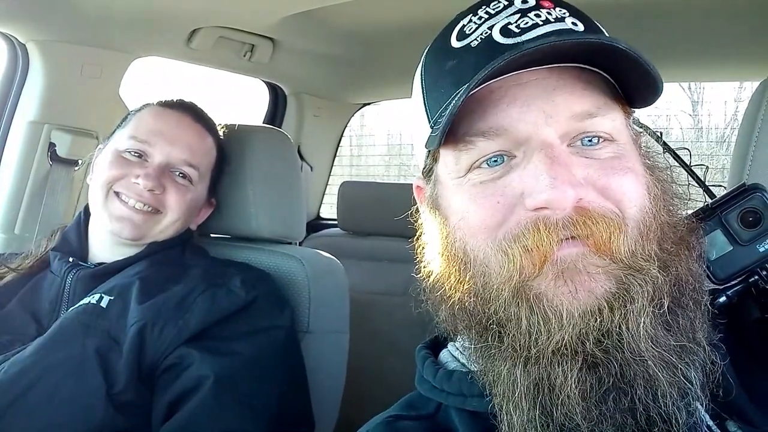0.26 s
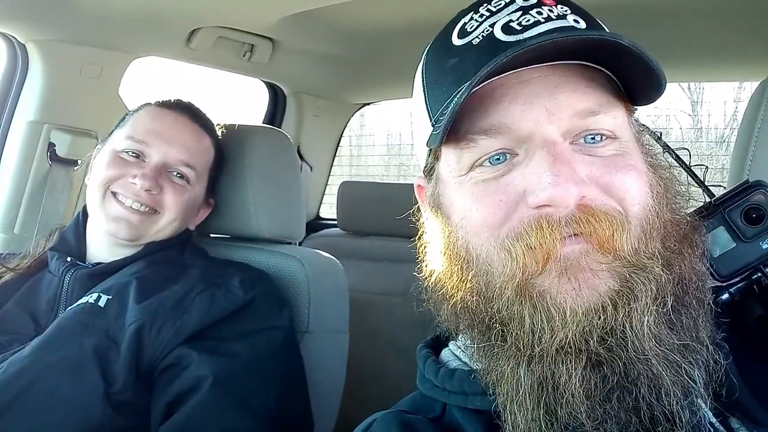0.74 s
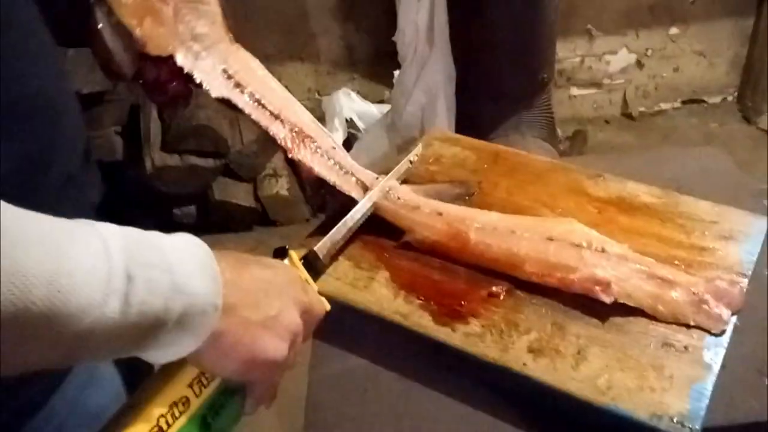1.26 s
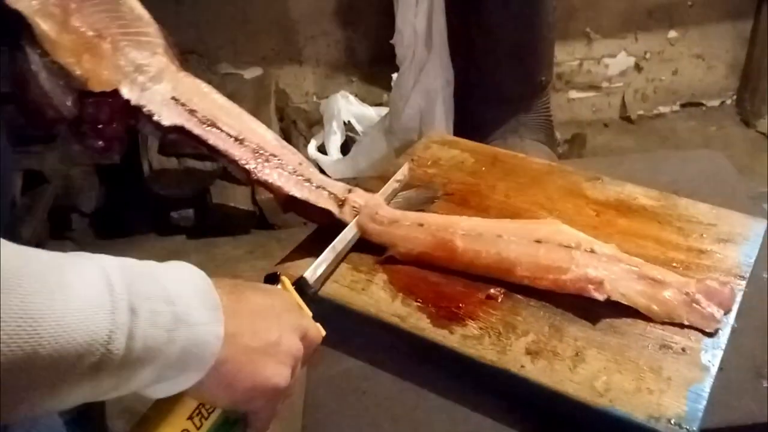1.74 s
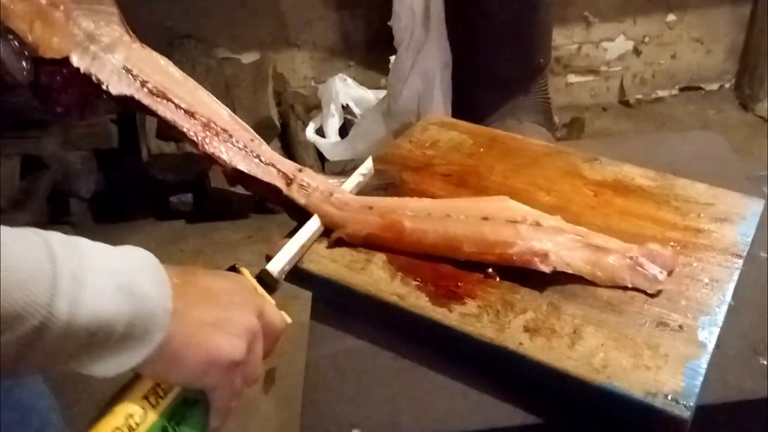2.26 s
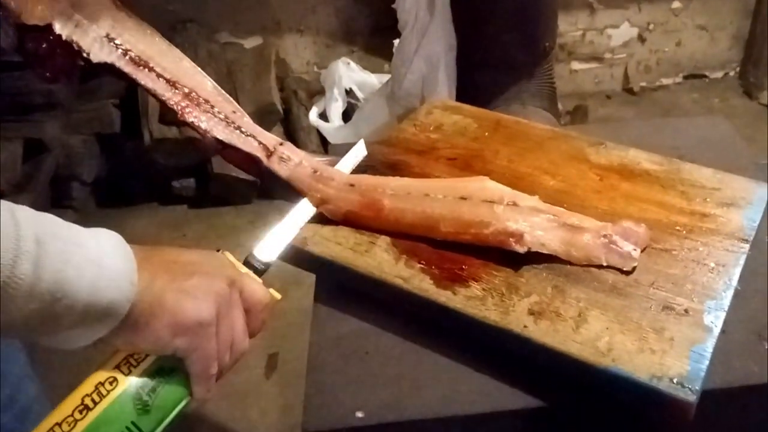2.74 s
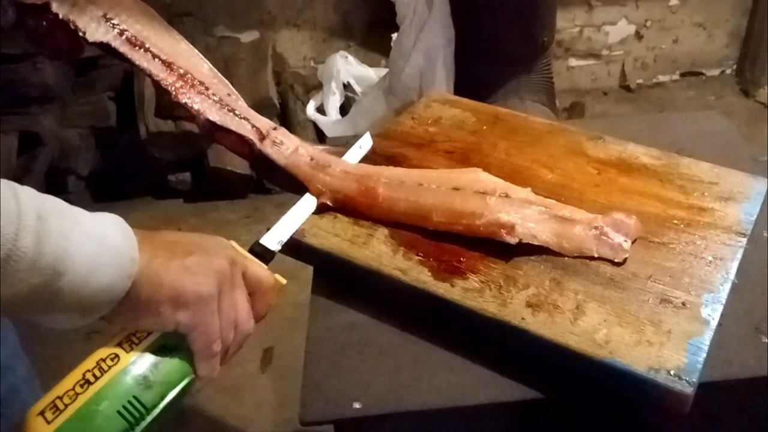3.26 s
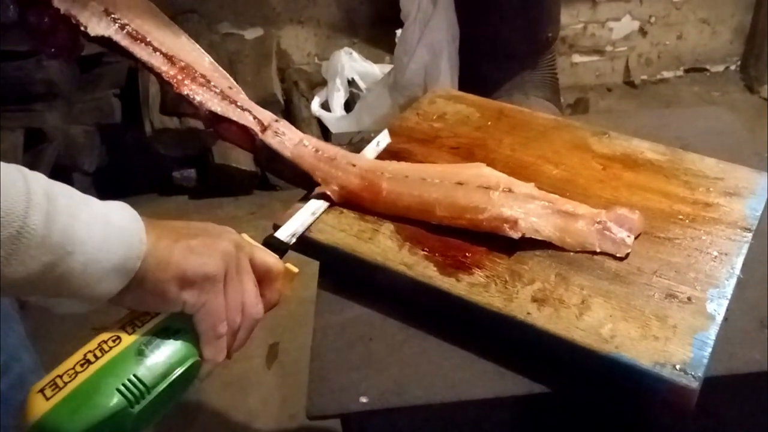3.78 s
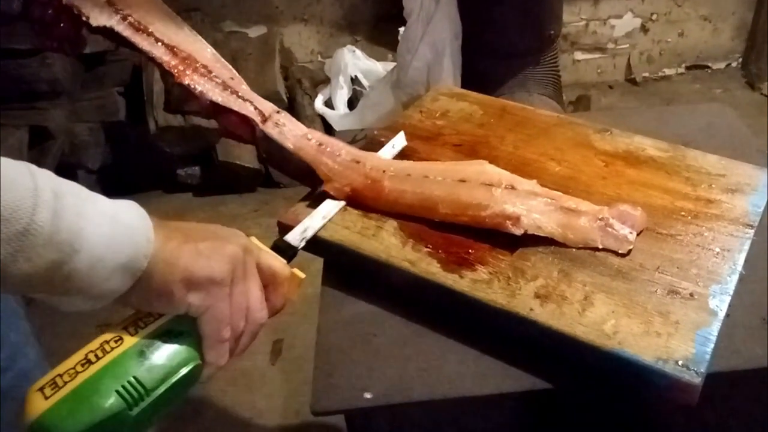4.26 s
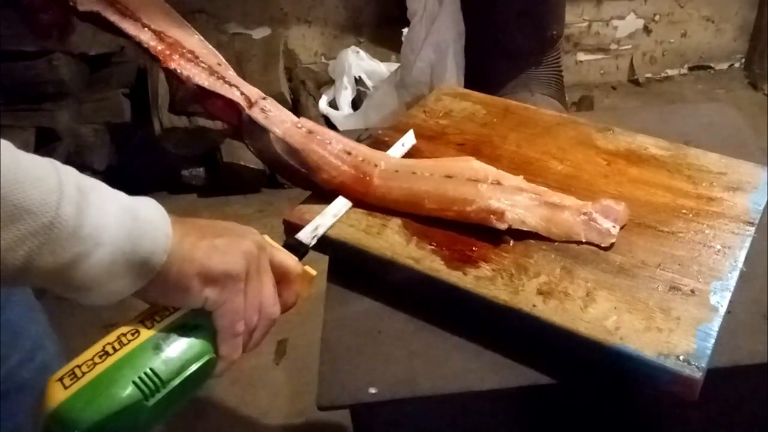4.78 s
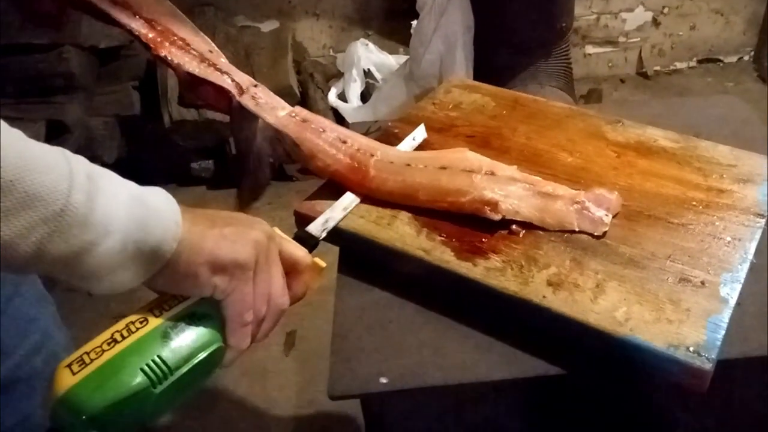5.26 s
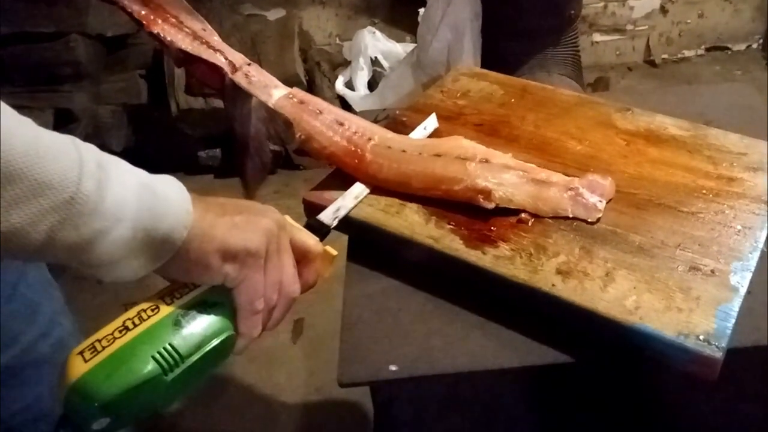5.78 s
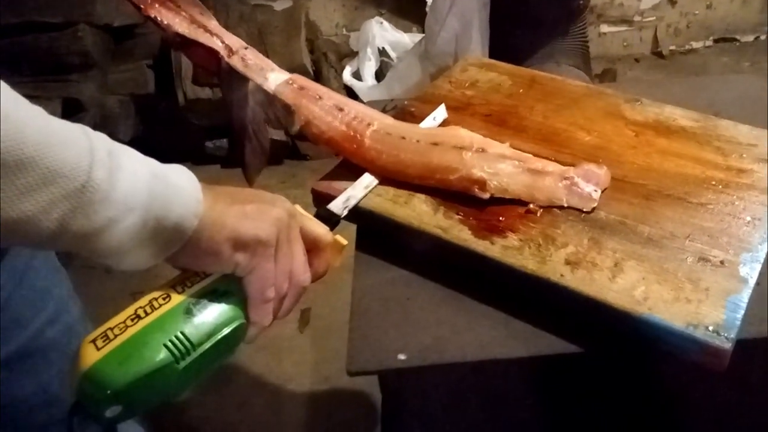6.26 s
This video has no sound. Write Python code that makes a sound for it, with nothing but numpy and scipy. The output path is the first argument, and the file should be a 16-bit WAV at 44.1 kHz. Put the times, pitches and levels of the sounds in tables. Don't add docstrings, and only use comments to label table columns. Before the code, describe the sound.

Brief jacket rustle and thump inside a still car cabin, a short silence, then a harsh buzzing electric knife motor runs on, slowly sagging in pitch.

```python
import sys
import numpy as np
from scipy import signal
from scipy.fft import rfft, irfft, next_fast_len
from scipy.io import wavfile
from scipy.ndimage import uniform_filter1d, map_coordinates

SR = 44100
rng = np.random.default_rng(int(sys.argv[2]) if len(sys.argv) > 2 else 0)


def gain_from_db(level_db):
    decades = np.asarray(level_db, float) / 20
    return 10 ** decades


def unload_wav(signal):
    wavfile.write(
        sys.argv[1],
        SR,
        np.round(np.clip(np.atleast_2d(signal).T, -1, 1) * 32767).astype(np.int16),
    )


N = 287532

# freq_hz, density_db
CABIN_SPECTRUM = [(18, -50), (30, -30), (79, -13), (133, -9), (202, -17), (315, -18), (455, -15),
                  (606, -16), (2830, -13.5), (4650, -5), (5300, 4), (6540, 9), (8500, -3.5), (15500, -22)]
# freq_hz, density_db
CLOTH_SPECTRUM = [(59, -58), (100, -23), (244, -31), (535, -4), (721, -25), (970, 4.5), (1080, -11),
                  (2580, -9), (4470, -11.5), (6700, -7.5), (16000, -42)]
# freq_hz, density_db
KNOCK_SPECTRUM = [(200, -28), (600, -3), (1600, 11), (3000, -3), (4500, -24), (6500, -7), (9000, -39),
                  (16000, -38)]
# freq_hz, density_db
HOUSING_SPECTRUM = [(280, -42), (480, -21), (732, 0.5), (899, -6), (1180, -2), (1820, -5), (1990, -5.5),
                    (2190, -4.5), (2440, -9.5), (2540, -6), (3090, -17), (4230, -27.5), (5000, -23.5),
                    (6500, -76), (11000, -120)]
# centre_hz, width_hz, peak_db
SHELL_MODES = [(656, 14, 7), (817, 65, 8.5), (1000, 100, 3), (1192, 67, 5), (2035, 17, 7)]
# freq_hz, density_db
VENT_SPECTRUM = [(1760, -31), (3000, -5.5), (3400, -14), (3880, -6.5), (4240, -27), (4910, -13.5),
                 (5180, -8), (6560, -0.5), (8650, -13), (9340, -16.5), (10900, -16.5), (12100, -16.5),
                 (13000, -25), (14400, -21.5), (15700, -22)]
# freq_hz, density_db
BOARD_SPECTRUM = [(100, -44), (190, -27), (260, -9.5), (400, -5), (520, -2.5), (600, 5.5), (800, -73)]
# freq_hz, density_db
RUMBLE_SPECTRUM = [(15, -30), (40, -30), (90, -26), (130, 8), (190, -1), (300, -49)]

# peak_s, rise_s_per_10db, fall_s_per_10db, level_db, centre_hz
SWISHES = [
    (.005, .05, .06, -54, 1400),
    (.058, .035, 0.036, -43.5, 2400),
    (.105, .04, .022, -43, 1125),
    (.155, .02, 0.042, -60.5, 990),
    (.208, .02, .035, -55.5, 3030),
    (.27, .02, 0.062, -66, 1400),
]
# time_s, pitch_hz, level_db
SQUEAK = [(.035, 2950, -67), (.045, 2700, -46), (.06, 2610, -43), (.08, 2530, -68)]
# start_s, peak_db, pitch_hz, t60_s
RING_KNOCKS = [
    (.112, -35, 125, 0.05),
    (.209, -48, 3110, .044),
    (.244, -35, 1000, 0.042),
    (.254, -45, 131, .18),
    (.248, -39.5, 297, 0.028),
    (.608, -62, 1000, 0.14),
    (.642, -56, 873, .12),
    (.66, -51, 887, .06),
    (2.16, -40, 164, 0.2),
]
# start_s, level_db, t60_s
CRACKS = [
    (.244, -39.5, 0.027),
    (.254, -70, .1),
    (0.273, -55, 0.088),
    (1.318, -54, 0.053),
    (1.342, -56, .04),
    (1.37, -52, 0.059),
    (1.388, -30, 0.038),
]

# position_strokes, width_strokes, boost_db
CRANK_KNOCKS = [
    (.30, 0.17, -2),
    (0.406, 0.014, 9),
    (.54, .02, -5),
    (0.802, 0.049, 0),
]
# time_s, speed_turns_per_s
SPEED_GOAL = [(1.43, 370), (1.49, 384), (1.6, 374.5), (1.83, 367.5), (2.15, 370.7), (2.33, 370.3),
              (2.5, 366.3), (2.62, 361.4), (2.9, 348.1), (3.1, 342.7), (3.4, 339.9), (3.9, 344.8),
              (4.15, 343.2), (4.55, 334.2), (4.85, 327.9), (5.2, 327.1), (6.2, 328.3), (6.52, 327.8)]
# peak_s, half_length_s, pitch_hz, t60_s, level_db
SURGES = [
    (1.432, 0.034, 2440, 0.011, -31),
    (1.6, 0.014, 1300, .005, -58),
    (3.588, 0.087, 950, 0.023, -27),
]
# start_s, end_s, level_db
PRESSES = [
    (1.67, 1.778, -68),
    (2.129, 2.27, -63),
    (2.503, 2.8, -57),
    (2.967, 3.45, -55),
    (4.17, 4.723, -51),
    (4.833, 5.727, -53),
    (5.826, 6.6, -54.5),
]
# peak_s, half_length_s, thrum_boost_db, rumble_boost_db
BUMPS = [
    (1.76, .03, -1, -6),
    (2.173, 0.083, 0, 15.5),
    (2.926, .25, -0.5, 13.5),
    (3.55, .12, 0.5, -6.0),
    (3.863, 0.04, 2.5, 3),
    (6.38, 0.088, -1, 6.0),
]
# peak_s, half_length_s, tick_boost_db
BINDS = [
    (2.046, 0.077, 6),
    (3.5, .3, 1),
    (5.5, 0.1, 6.0),
    (6.053, .08, 5.0),
]
# multiple_of_turn_rate, level_db, full_load_db, strain_db
SLOT_TONES = [(7.998, -0.6, 2.5, -3), (15.94, -2.3, 3, -6), (24.3, -11.0, -1, 16.5), (31.86, -1.8, 4, -6)]
# centre_hz, width_hz, peak_db
SLOT_MODES = [(1200, 200, -24), (1650, 300, -37), (2060, 170, -23), (3400, 300, -39), (6800, 500, -42),
              (2600, 130, -32), (2700, 60, -32), (2935, 60, -32), (5480, 150, -42), (5660, 200, -39),
              (5860, 120, -43), (7700, 500, -52), (10800, 900, -53), (11750, 300, -54)]
# peak_s, half_length_s, multiple_of_turn_rate, change_db
FLARES = [(1.425, .025, 16, 12), (1.47, .02, 16, -8), (2.72, .07, 8, -10), (1.68, .03, 8, -4),
          (2.8, .07, 16, 4), (1.62, .05, 24, 5), (1.45, .03, 8, 7), (1.48, .035, 24, -10),
          (1.68, .08, 16, 6), (1.57, .04, 16, 8), (1.585, .03, 8, 2), (4.55, .17, 8, 3),
          (3.33, .2, 8, -4.0), (4.36, .06, 8, 3.0), (4.89, .08, 16, -9.0), (5.4, .4, 16, -6.0),
          (6.25, .25, 16, 6.0), (2.05, .08, 32, -7.0), (2.75, .1, 32, -5.0)]
FAINT_MULTIPLES = (1.2, 1.3, 2, 2.1, 2.2, 2.3, 2.4, 3, 4, 4.4, 5.9, 6.2, 7.8, 8.2, 8.6, 8.8, 9, 20, 26, 29,
                    30, 34, 38, 48)
# early_cut_db, deep_cut_db
FAINT_LEVELS = [(-60, -55), (-57, -53), (-39, -39), (-43, -48), (-43, -38), (-45, -47), (-46, -43),
                (-39, -44), (-43, -47), (-47, -44), (-43, -46), (-45, -49), (-50, -42), (-58, -51),
                (-58, -51), (-58, -52), (-60, -54), (-52, -56), (-64, -57), (-70, -69), (-62, -67),
                (-66, -69), (-70, -65), (-54, -63)]
# peak_s, half_length_s, multiple_of_turn_rate, side_sign, level_db
SIDE_TONES = [
    (5.5, 0.83, 16, -1, -54),
    (5.5, 1.0, 16, 1, -63),
]

CUT_S, RESUME_S, SHED_DB = 1.213, 1.256, -87
CABIN_LOW_DB, CABIN_HIGH_DB, CABIN_TOP_DB = -69.5, -78, -89
SETTLE_S, SETTLE_FALL_S, SETTLE_DB = .27, .08, -68
TURNS_PER_STROKE, MAINS_BEAT_HZ = 10, 120
SWITCH_ON_S, SPIN_UP_S, UP_TO_SPEED_S = 1.345, .2, 2.0
FREE_TURNS_PER_S, SAG_TURNS_PER_S = 370, 43
RATED_TURNS_PER_S = 350
JOLT_S, JOLT_RISE_S, JOLT_FALL_S = 1.415, .02, 0.055
# level_db at rated speed, speed_power, start_jolt_db
RATTLE, HISS, THRUM = (-28, 1.28, -28), (-39, 2, -41), (-52, 1.4, -60)
RUMBLE_DB, HUM_REST_DB, TICK_DB, TICK_DEEP_DB = -78, -71, -60, 7
PRESS_EDGE_S = 0.14
DEEP_CUT_S = 3.4, 5.1
BITE_S, BITE_HALF_S, BITE_DB = 3.92, 0.64, 2
BEATING_S, BEATING_HALF_S, BEATING_DEPTH = 3.5, .85, .7
DEAD_HZ, DEAD_WIDTH_HZ, DEAD_DB = 4300, 500, -10
BOOM_HZ, BOOM_STRAIN_DB = 950, -10
LOW_LINES_STRAIN_DB = -55
FAINT_FREE_DB, FAINT_LOAD_DB, FAINT_RUN_UP_DB = -16.5, 21.5, -2


def rms_one(x):
    return x / np.sqrt(np.mean(x ** 2) + 1e-20)


def in_time(rows):
    s, *columns = np.transpose(rows)
    return [np.interp(np.arange(N) / SR, s, c) for c in columns]


def window(start_s, stop_s):
    t = np.arange(N) / SR
    return np.clip((t - start_s) * 500, 0, 1) * np.clip((stop_s - t) * 500, 0, 1)


def swell(at_s, half_s):
    return np.exp(-((np.arange(N) / SR - at_s) / half_s) ** 2)


def slopes_db(at_s, rise_s, fall_s):
    t = np.arange(N) / SR - at_s
    return -10 * np.maximum(-t / rise_s, t / fall_s)


def drift(rate_hz):
    knots = rng.standard_normal(2000)
    return map_coordinates(knots, [np.arange(N) / SR * rate_hz], order=3)


def coloured(x, spectrum, modes=()):
    size = next_fast_len(N)
    hz = np.arange(size // 2 + 1) * SR / size + 1
    points = np.array(spectrum)
    db = np.interp(np.log(hz), np.log(points[:, 0]), points[:, 1])
    for centre_hz, width_hz, peak_db in modes:
        db = db + peak_db / (1 + (2 * (hz - centre_hz) / width_hz) ** 2)
    return rms_one(irfft(rfft(x, size) * gain_from_db(db), size)[:N])


def filtered(x, order, hz, kind="low"):
    return signal.sosfilt(signal.butter(order, hz, kind, fs=SR, output="sos"), x)


def ring(clicks, hz, t60_s):
    r, w = gain_from_db(-60 / (t60_s * SR)), 2 * np.pi * hz / SR
    return signal.lfilter([0, np.sin(w)], [1, -2 * r * np.cos(w), r * r], clicks + 1e-18)


def cabin():
    air = coloured(rng.standard_normal(N) * gain_from_db(drift(20)), CABIN_SPECTRUM)
    low = rms_one(filtered(air, 4, 2000))
    high = rms_one(filtered(air, 4, 2000, "high"))
    top = filtered(rng.standard_normal(N), 2, 8000, "high")
    settle = gain_from_db(SETTLE_DB + slopes_db(SETTLE_S, 0.022, SETTLE_FALL_S))
    high_level = gain_from_db(CABIN_HIGH_DB + 2.0 * drift(3.1)) + settle
    return gain_from_db(CABIN_LOW_DB) * low + high_level * high + gain_from_db(CABIN_TOP_DB) * top


def shed():
    level = gain_from_db(SHED_DB) * window(RESUME_S, 9) + gain_from_db(-66) * window(1.318, 9)
    return coloured(rng.standard_normal(N), KNOCK_SPECTRUM) * level


def jacket():
    powers = np.array([gain_from_db(db + slopes_db(s, rise_s, fall_s)) ** 2 + 1e-30
                       for s, rise_s, fall_s, db, _ in SWISHES])
    level = np.sqrt(powers.sum(0))
    centre_hz = np.array(SWISHES)[powers.argmax(0), 4]
    grain = rng.standard_normal(N) * gain_from_db(1.7 * drift(151))
    broad = coloured(grain, CLOTH_SPECTRUM)
    slow = filtered(rng.standard_normal(N), 2, 450)
    band = rms_one(slow) * np.sin(2 * np.pi * np.cumsum(centre_hz) / SR)
    squeak_hz, squeak_db = in_time(SQUEAK)
    phase = 2 * np.pi * np.cumsum(squeak_hz) / SR
    squeak = gain_from_db(squeak_db + 2.6 * drift(127)) * (np.sin(phase) + .5 * np.sin(2 * phase))
    return level * (0.82 * broad + band) * window(-1, 0.29) + squeak * window(0.037, .082)


def knocks():
    out = np.zeros(N)
    grit = coloured(rng.standard_normal(N), KNOCK_SPECTRUM)
    age_s = np.arange(SR // 2) / SR
    for s, db, hz, t60_s in RING_KNOCKS:
        onset = np.minimum(age_s * hz / 2, 1)
        out[round(s * SR):][:len(age_s)] += gain_from_db(db) * onset * ring(age_s == 0, hz, t60_s)
    for s, db, t60_s in CRACKS:
        span = slice(round(s * SR), round(s * SR) + len(age_s))
        out[span] += grit[span] * gain_from_db(db - 60 * age_s / t60_s) * np.minimum(age_s / 0.00045, 1)
    return out


def mains_beat():
    return 2 * np.pi * MAINS_BEAT_HZ * np.arange(N) / SR + 2.6


def rotor():
    goal = uniform_filter1d(in_time(SPEED_GOAL)[0], size=3500)
    age_s = np.maximum(np.arange(N) / SR - SWITCH_ON_S, 0)
    load = np.clip((FREE_TURNS_PER_S - goal) / SAG_TURNS_PER_S, 0, 1)
    return goal * (1 - np.exp(-age_s / SPIN_UP_S)), load


def with_speed(per_s, part):
    db, power, jolt_db = part
    running = gain_from_db(db) * (per_s / RATED_TURNS_PER_S) ** power
    return np.hypot(running, gain_from_db(jolt_db + slopes_db(JOLT_S, JOLT_RISE_S, JOLT_FALL_S)))


def crank_beat(strokes):
    return sum(db * np.exp(-(((strokes - at + .5) % 1 - .5) / width) ** 2)
               for at, width, db in CRANK_KNOCKS)


def hum_gain():
    t = np.arange(N) / SR
    gain = gain_from_db(HUM_REST_DB)
    for start_s, end_s, db in PRESSES:
        inside_s = np.minimum(t - start_s, end_s - t)
        gain = gain + gain_from_db(db) * np.clip(inside_s / PRESS_EDGE_S + .5, 0, 1)
    return gain


def surges(pulse_db):
    out = 0
    for s, half_s, hz, t60_s, db in SURGES:
        tone = ring(ring(rng.standard_normal(N), hz, t60_s), hz, t60_s)
        out = out + gain_from_db(db + pulse_db) * swell(s, half_s) * rms_one(tone)
    return out


def vents(strokes, pulse_db):
    throb_db = 0.97 * crank_beat(strokes) + 0.27 * pulse_db + drift(8)
    return coloured(rng.standard_normal(N) * gain_from_db(throb_db), VENT_SPECTRUM)


def blade_ticks(strokes, tick_db):
    out = 0
    for at, extra_db, spread_db in ((.30, 0, 2.0), (.82, -6, 3.0), (.53, -10, 3.0)):
        strike = np.diff(np.floor(strokes - at), prepend=-1.0) > 0
        level = gain_from_db(tick_db + 29 + extra_db + spread_db * drift(6))
        out = out + signal.lfilter([1], [1, -.95], strike * level) * rng.standard_normal(N)
    return filtered(out, 3, [13700, 15200], "band")


def gears(strokes, pulse_db, repeat, twin, wear):
    half = rng.standard_normal((40, 256))
    teeth = twin * np.tile(half, 2) + rng.standard_normal((40, 512))
    place = [strokes * wear % 40, strokes % 1 * 512]
    looped = map_coordinates(teeth, place, order=3, mode="grid-wrap")
    share = np.clip(repeat, 0, 1)
    rattle = np.sqrt(share) * rms_one(looped) + np.sqrt(1 - share) * rng.standard_normal(N)
    return rattle * gain_from_db(crank_beat(strokes) + pulse_db + 0.49 * drift(9))


def shell(rattle, strain):
    sound = coloured(rattle, HOUSING_SPECTRUM, SHELL_MODES)
    boom = signal.sosfiltfilt(signal.butter(3, BOOM_HZ, fs=SR, output="sos"), sound)
    return sound + (gain_from_db(BOOM_STRAIN_DB * strain * window(0, UP_TO_SPEED_S)) - 1) * boom


def side_tones(turns):
    out = 0
    for s, half_s, multiple, side, db in SIDE_TONES:
        phase = 2 * np.pi * round(multiple) * turns + np.sign(side) * mains_beat()
        out = out + gain_from_db(db + 0.5 * drift(11)) * swell(s, half_s) * np.sqrt(2) * np.sin(phase)
    return out


def slot_levels(per_s, load, strain):
    lines = []
    for multiple, db, load_db, strain_db in SLOT_TONES:
        pitch_hz = multiple * per_s
        power = sum(gain_from_db(peak_db) ** 2 / (1 + (2 * (pitch_hz - hz) / width_hz) ** 2)
                    for hz, width_hz, peak_db in SLOT_MODES)
        flare_db = sum(change_db * swell(s, half_s) for s, half_s, which, change_db in FLARES
                       if round(which) == round(multiple))
        dead_db = DEAD_DB * np.exp(-((pitch_hz - DEAD_HZ) / DEAD_WIDTH_HZ) ** 2)
        level_db = db + dead_db + load_db * load + strain_db * strain + flare_db + 10 * np.log10(power)
        lines.append((round(multiple), level_db))
    return lines


def faint_levels(load, strain, deep):
    trim_db = FAINT_FREE_DB + FAINT_LOAD_DB * load + FAINT_RUN_UP_DB * strain ** 2
    lines = []
    for multiple, (early_db, late_db) in zip(FAINT_MULTIPLES, FAINT_LEVELS):
        if multiple > 4.2:
            change_db = trim_db - 27.0 * strain * (1 if multiple < 40 else -.8)
        else:
            change_db = LOW_LINES_STRAIN_DB * strain * window(0, UP_TO_SPEED_S)
        level_db = change_db + early_db + deep * (late_db - early_db) + 1.4 * drift(2.943)
        lines.append((multiple, level_db))
    return lines


def whine(turns, strain, per_s, load):
    deep = np.interp(np.arange(N) / SR, DEEP_CUT_S, [0, 1])
    beat = np.cos(mains_beat())
    wobble = turns + .004 * drift(25) + strain * (.012 * np.sin(mains_beat()) + .016 * drift(200))
    depth = np.minimum(.26 - .04 * deep + .7 * strain, 1)
    shake = (1 + depth * beat) * (1 + .2 * np.cos(2 * np.pi * .4 * turns))
    throb = shake + BEATING_DEPTH * swell(BEATING_S, BEATING_HALF_S) * beat
    out = 0
    for multiple, db in slot_levels(per_s, load, strain) + faint_levels(load, strain, deep):
        level = gain_from_db(db + 0.96 * drift(14) + 4.4 * strain * drift(35)) * np.sqrt(2)
        pulse = throb if multiple == 8 else shake if multiple > 7 else 1
        out = out + level * pulse * np.sin(2 * np.pi * (multiple * wobble + rng.random()))
    return out


def knife():
    per_s, load = rotor()
    turns = np.cumsum(per_s * window(1.36, 9)) / SR
    strokes = turns / TURNS_PER_STROKE
    strain = np.sqrt(np.clip(1 - per_s / 345, 0, 1))
    pulse_db = (0.067 + 0.6 * strain ** 2) * np.cos(mains_beat())
    speed_squared = (per_s / RATED_TURNS_PER_S) ** 2
    board_db, rumble_db = sum(np.outer(boosts, swell(s, half_s)) for s, half_s, *boosts in BUMPS)
    bind_db = sum(db * swell(s, half_s) for s, half_s, db in BINDS)
    tick_db = TICK_DB + TICK_DEEP_DB * load + bind_db - 25 * strain

    rattle = gears(strokes, pulse_db, repeat=0.15, twin=0.92, wear=0.0585)
    bite = gain_from_db(1.0 + BITE_DB * swell(BITE_S, BITE_HALF_S))
    out = bite * with_speed(per_s, RATTLE) * shell(rattle, strain)
    thrum = coloured(gears(strokes, 0, repeat=.6 - 0.9 * strain, twin=0.32, wear=0.0316), BOARD_SPECTRUM)
    out += gain_from_db(board_db + 2.5) * with_speed(per_s, THRUM) * thrum
    rumble = coloured(rng.standard_normal(N), RUMBLE_SPECTRUM)
    out += gain_from_db(RUMBLE_DB + rumble_db + 7.0 + 2.2 * drift(7)) * speed_squared * rumble
    out += gain_from_db(1.5) * with_speed(per_s, HISS) * vents(strokes, pulse_db)
    out += gain_from_db(-7.0) * hum_gain() * speed_squared * np.sqrt(2) * np.sin(np.pi * turns)
    out += whine(turns, strain, per_s, load) * np.clip(per_s / 130 - .5, 0, 1) ** 2
    out += blade_ticks(strokes, tick_db) + surges(pulse_db) + side_tones(turns)
    return out * window(1.366, 9)


def scene():
    handling = (jacket() + knocks()) * (1 - window(CUT_S, RESUME_S))
    return (cabin() * window(-1, CUT_S) + shed() + handling + knife())[None]


def roll_off(x):
    return signal.sosfilt(signal.butter(12, 16560, fs=SR, output="sos"), x)


def record(dry):
    rounded = .5 * np.tanh(dry / .5)
    thin = filtered(rounded, 2, 70, "high")
    mix = signal.sosfilt(signal.ellip(14, .5, 75, 15730, fs=SR, output="sos"), thin)
    return roll_off(mix)


dry = scene()
out = record(dry)
unload_wav(out)
```